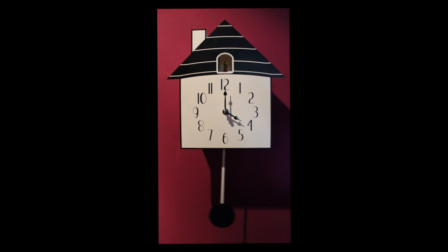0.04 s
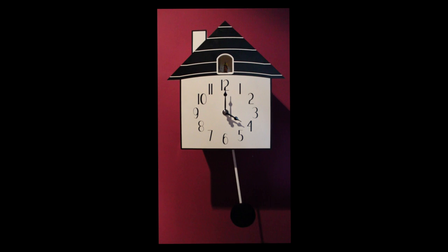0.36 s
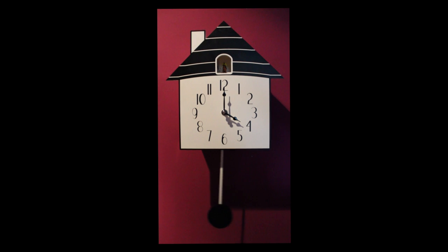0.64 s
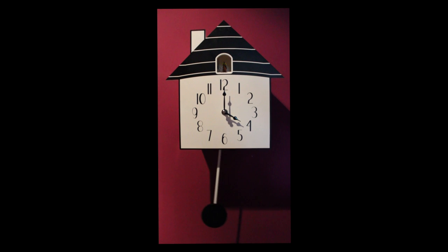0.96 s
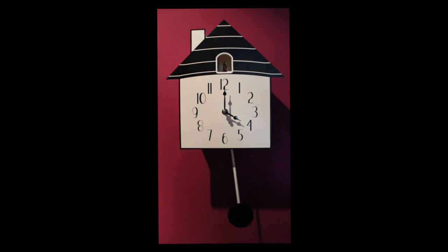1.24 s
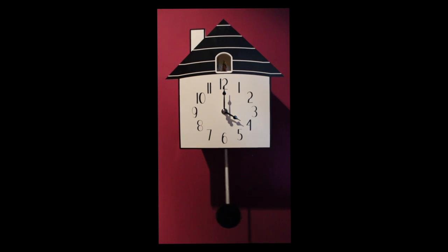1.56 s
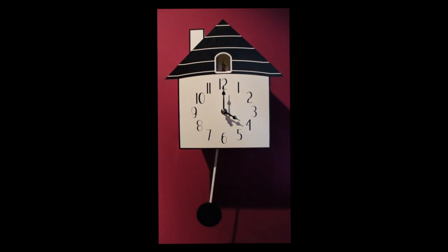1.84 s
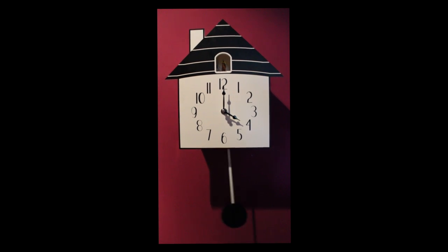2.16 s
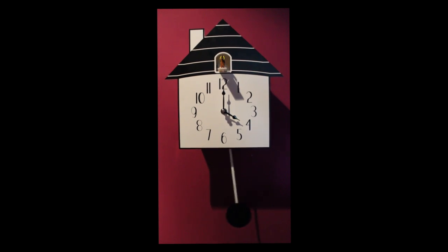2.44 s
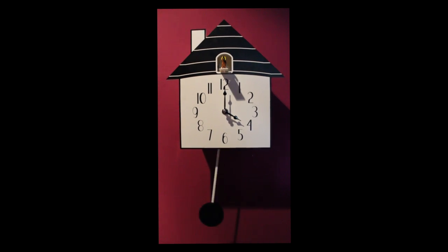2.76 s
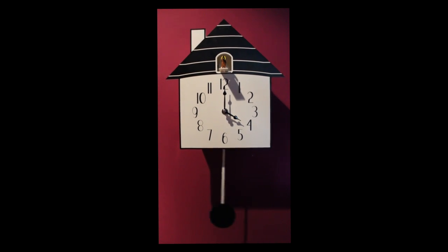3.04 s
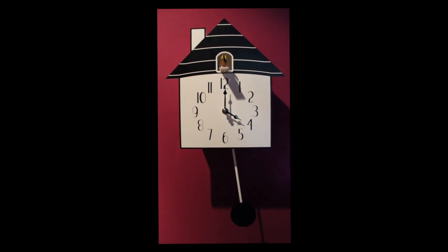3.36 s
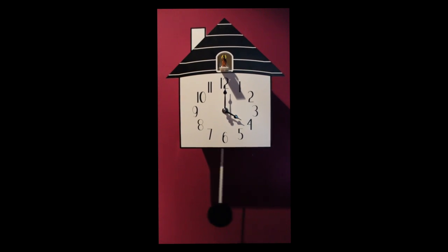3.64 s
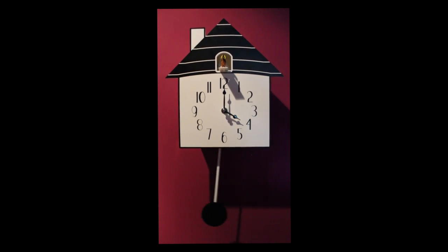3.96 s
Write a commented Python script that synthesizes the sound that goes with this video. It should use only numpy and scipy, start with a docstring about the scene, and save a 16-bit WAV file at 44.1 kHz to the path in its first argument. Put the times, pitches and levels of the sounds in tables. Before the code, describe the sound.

A small cuckoo clock mechanism gives a few light ticks, then a sharp latch clack. Its motor rasps as the figure slides out, then the gears whir and rattle on. Heard close in a quiet, dry room.

```python
"""A small wall clock in a quiet, dry room, heard close by on one microphone.
Over faint room air come a few light ticks, then the knock of the release lever and, at 2 s, the
sharp clack of a latch. The motor starts and rasps harder as it pushes a little figure out, sticking
and slipping, against a stop at 2.4 s. Then the worn gears whir on, their teeth shaking the plastic
case and throbbing once a turn."""
import sys
import numpy as np
from scipy import signal
from scipy.fft import rfft, irfft
from scipy.io import wavfile
from scipy.ndimage import uniform_filter1d

SR = 44100
rng = np.random.default_rng(int(sys.argv[2]) if len(sys.argv) > 2 else 0)


def digitize_waveform(pressure):
    """Quantize a signal to 16-bit integers and store it at the path in sys.argv[1].

    Rows of a 2-D input are taken as channels; values are limited to [-1, 1].
    """
    field = np.atleast_2d(pressure).T
    bounded = np.clip(field, -1, 1)
    quanta = np.round(bounded * 32767).astype(np.int16)
    wavfile.write(sys.argv[1], SR, quanta)


N = 176400
TIME = np.arange(N) / SR


def undb(db):
    """Decibels to gain."""
    return 10 ** (np.asarray(db) / 20)


def unit(x):
    """Scale to rms 1."""
    return x / np.sqrt(np.mean(x ** 2) + 1e-24)


def curve(rows):
    """Join (time [s], value) rows by straight lines."""
    return np.interp(TIME, *np.array(rows).T)


def fade(t, t60):
    """Exponential decay that starts at t = 0."""
    return (t >= 0) * np.exp(-np.log(1000) * np.maximum(t, 0) / t60)


def wander(rate_hz):
    """Smooth random motion at rms 1."""
    size = int(SR / rate_hz)
    steps = np.repeat(rng.standard_normal(N // size + 1), size)
    return unit(uniform_filter1d(steps, size)[:N])


def colour(x, points):
    """Causal filter through (frequency [Hz], gain [dB]) points, falling away below the first."""
    hz, db = np.array(points).T
    f = np.maximum(np.arange(N + 1) * SR / (2 * N), 1)
    shape_db = np.interp(np.log(f), np.log(hz), db) - 10 * np.log10(1 + (hz[0] / 2 / f) ** 2)
    cepstrum = irfft(np.log(undb(shape_db)))
    cepstrum[1:N] *= 2  # fold to minimum phase
    cepstrum[N + 1:] = 0
    return irfft(rfft(x, 2 * N) * np.exp(rfft(cepstrum)))[:N]


def tilt(rows, db_per_octave):
    """Brighten or dull a table whose rows begin with (frequency [Hz], level [dB])."""
    return [(hz, db + db_per_octave * np.log2(hz / rows[0][0]), *rest) for hz, db, *rest in rows]


def resonate(x, hz, width):
    """A steep resonance: two band-passes in a row."""
    b, a = signal.iirpeak(hz, hz / (1.78 * width), fs=SR)
    return signal.lfilter(b, a, signal.lfilter(b, a, x))


def clicks(times, sizes):
    """Impulses at the given moments."""
    return np.bincount(np.clip(times * SR, 0, N).astype(int), sizes, N + 1)[:N]


def scrape(hits, decay_s):
    """Each click drags a short burst of friction noise behind it."""
    pole = np.exp(-2 / (decay_s * SR))
    power = signal.lfilter([1 - pole], [1, -pole], hits ** 2 + 1e-18)
    return np.sqrt(power) * rng.standard_normal(N)


def tail(x, t60):
    """Diffuse ringing with about the energy of its input."""
    t = np.arange(SR // 2) / SR
    response = rng.standard_normal(len(t)) * fade(t, t60)
    return signal.fftconvolve(x, response / np.linalg.norm(response))[:N]


def blow(at, spectrum, t60, rise, modes=(), ring_db=0):
    """A short crack plus ringing modes, with the energy of 10 ms at rms 1."""
    t = TIME - at
    attack = 1 - np.exp(-np.maximum(t, 0) / rise)
    hit = unit(colour(rng.standard_normal(N) * attack * fade(t, t60), spectrum))
    if len(modes):
        ring = sum(undb(db) * fade(t, life) * np.sin(2 * np.pi * (hz * t + rng.random()))
                   for hz, db, life in modes)
        hit = hit + undb(ring_db) * unit(ring * attack)
    return unit(hit) * np.sqrt(0.01 * SR / N)


def room_tone():
    """Soft air all round the microphone, with a faint hum and a thin, steady whistle."""
    # spectrum of the air, bands of hum, whistle tones (frequency [Hz], level [dB])
    air_spectrum = [(15, -32), (25, -16), (64, -4.5), (119, -8.5), (289, -6.5), (389, -4), (421, -9),
                    (567, -11.5), (614, -12), (1620, -15.5), (1750, -14.5), (2560, -16), (3260, -15),
                    (4500, -17.5), (5880, -14.5), (6550, -17.5), (15500, -24.5)]
    hum_bands = [(243, -77), (293, -75.5), (391, -79), (1820, -81.5), (6040, -80)]
    whistle_tones = [(7983, -81.5), (8979, -83), (9976, -80)]
    hum = sum(undb(db) * unit(resonate(rng.standard_normal(N), hz, width=5.7)) for hz, db in hum_bands)
    whistle = sum(undb(db) * unit(np.sin(2 * np.pi * hz * TIME)) for hz, db in whistle_tones)
    air = undb(-64.5) * unit(colour(rng.standard_normal(N), air_spectrum))
    return air + hum + whistle


def bumps():
    """A few soft, dull bumps in the background."""
    # bumps (time [s], level [dB])
    hits = [(1.504, -56), (3.54, -58.5), (3.613, -53.5), (3.929, -54.5)]
    # their low thud (frequency [Hz], level [dB])
    thud = [(40, -13), (90, -5), (180, 0), (300, -10), (700, -29), (2000, -60)]
    return sum(undb(db) * blow(at, thud, t60=0.05, rise=0.0039) for at, db in hits)


def squeaks():
    """Brief, faint, high squeaks and rubs in the works."""
    # swells of noise (time [s], pitch [Hz], width [Hz], level [dB], half length [s])
    rubs = [(0.065, 4600, 1500, -58.5, .009), (0.651, 5500, 2000, -64, 0.0054),
            (1.373, 6045, 60, -63.5, .025), (1.135, 6045, 60, -71, .03), (1.687, 3000, 3500, -62.5, .015)]
    sound = np.zeros(N)
    for at, hz, width, db, half in rubs:
        swell = np.exp(-((TIME - at) / half) ** 2)
        sound += undb(db) * swell * unit(resonate(rng.standard_normal(N), hz, width))
    return sound


def ticks():
    """Light, dry ticks at uneven intervals, some brighter than others."""
    # ticks (time [s], level [dB], brightness [dB per octave])
    hits = [(0.0997, -52.5, -0.5), (.169, -61, 0.5), (0.369, -50.5, 1), (0.408, -47, 1),
            (.582, -45.5, -0.5), (1.303, -65, -8), (1.322, -60, -6.5), (1.922, -47, -1), (3.283, -46.5, 0),
            (3.945, -44.5, 5)]
    # crack of a tick (frequency [Hz], level [dB])
    crack = [(300, -34), (1300, -12), (3280, -9), (4700, -11.5), (6300, -2.5), (7000, -18), (7900, -7),
             (10200, -12.5), (11000, -0.5), (12500, -21), (15500, -33)]
    # its ringing (frequency [Hz], level [dB], t60 [s])
    modes = [(1770, -16.5, 0.025), (2290, -9.5, 0.016), (3290, -4.5, 0.025), (6050, -6, 0.024),
             (6300, -5, 0.022), (7840, 3, 0.0092), (10840, 4.5, 0.0091), (11200, 1, 0.0083)]
    return sum(undb(db) * blow(at, tilt(crack, bright), t60=0.012, rise=0.0012,
                               modes=tilt(modes, bright), ring_db=1) for at, db, bright in hits)


def lever_knock():
    """The release lever knocks once and rings in the midrange."""
    # crack of the lever (frequency [Hz], level [dB])
    crack = [(120, -75), (200, -24), (1600, 0.5), (2280, -12), (3040, -16), (4910, -32), (5560, -24),
             (9470, -46), (10900, -26.5), (14000, -59)]
    # its ringing (frequency [Hz], level [dB], t60 [s])
    modes = [(490, -11.5, 0.051), (830, -14, 0.05), (1030, -6, 0.055), (1254, 7.5, 0.024),
             (1226, -29.5, 0.67), (1577, 5, 0.027), (2100, -0.5, 0.032), (2310, 1.5, 0.018)]
    return undb(-30.5) * blow(1.8662, crack, t60=0.018, rise=0.00037, modes=modes, ring_db=5)


def latch():
    """The latch clacks sharply and leaves a bright, diffuse ring."""
    # crack of the latch (frequency [Hz], level [dB])
    crack = [(120, -75), (200, -35), (720, -21.5), (1880, -37), (2800, -7.5), (3610, -15.5), (4100, -6),
             (4840, -11.5), (5110, -5.5), (5910, 1.5), (8820, -17.5), (11000, -12), (15500, -36)]
    # its ringing (frequency [Hz], level [dB], t60 [s])
    modes = [(2560, -17, 0.072), (2754, -9.5, 0.1), (3150, -16, 0.12), (4250, -5, .11), (5263, 4, 0.048),
             (5760, -12, 0.046), (5980, -15, 0.13), (6530, 3.5, 0.084), (7040, -11, 0.18),
             (7500, -11, 0.11), (8340, -12, 0.14), (10700, -4, 0.062)]
    clack = undb(-19.5) * blow(1.9972, crack, t60=0.037, rise=0.0016, modes=modes, ring_db=-4.5)
    return clack + undb(-6.5) * tail(clack, t60=0.14)


def figure_stop():
    """The figure hits its stop."""
    # crack of the impact (frequency [Hz], level [dB])
    crack = [(150, -32), (350, -18), (660, -7), (910, 1), (1630, -13.5), (2230, -0.5), (3200, -0.5),
             (3830, -9.5), (5400, -3), (6700, -15), (8800, -8.5), (15500, -32)]
    return undb(-20.3) * blow(2.3985, crack, t60=0.059, rise=0.0013)


def figure_rasp(slips_per_s=1100):
    """Dense stick-slip clicks as the figure is pushed out; now and then it catches and jerks free."""
    # swell of the slide, and the single jerks (time [s], level [dB])
    swell = [(2.075, -66), (2.092, -45), (2.104, -49), (2.112, -39.5), (2.17, -36), (2.195, -33),
             (2.322, -29.5), (2.345, -25), (2.39, -27.5), (2.425, -37), (2.48, -58)]
    catches = [(2.106, -35), (2.137, -35.5), (2.178, -32.5), (2.2773, -26), (2.3277, -26.5)]
    # spectrum of the friction (frequency [Hz], level [dB])
    friction = [(200, -38), (420, -13.5), (680, -15), (930, -2), (1150, -11), (1550, -9.5), (1730, -20),
                (2000, -12), (2450, -13.5), (2800, -9), (3500, -3), (3900, -10.5), (4500, -6.5), (5000, 1),
                (6050, -1.5), (6700, -15), (7350, -4), (7800, -11), (8800, -8.5), (11000, -19),
                (13500, -25), (15500, -29)]
    offset, strength, side = rng.random((int(slips_per_s * N / SR), 3)).T
    times = (np.arange(len(offset)) + offset) / slips_per_s
    slips = clicks(times, undb(9 * strength) * np.sign(side - 0.5))
    jerks = sum(undb(db) * blow(at, friction, t60=0.059, rise=0.0008) for at, db in catches)
    slips = slips + undb(8) * scrape(slips, decay_s=0.0016)
    sliding = (TIME > swell[0][0]) * (TIME < swell[-1][0])
    return unit(colour(slips, friction)) * undb(curve(swell)) * sliding + jerks


def throb(turns, depth_db, place):
    """Gain that swings once a turn; a positive depth peaks at the given place (0-1)."""
    return undb(depth_db * np.cos(2 * np.pi * (turns - place)))


def tooth_clicks(turns, count=48, jitter_s=0.00005, scatter_db=2):
    """Worn teeth click in nearly the same uneven pattern on every turn."""
    places = (np.arange(count) + rng.random(count)) / count
    signs = rng.choice([-1, 1], count)
    whole_turns = np.arange(np.ceil(turns[0]), np.ceil(turns[-1]))
    times = np.interp((whole_turns[:, None] + places).ravel(), turns, TIME, right=2 * TIME[-1])
    lag, force = rng.standard_normal((len(times), 2)).T
    return clicks(times + jitter_s * lag, np.tile(signs, len(whole_turns)) * undb(scatter_db * force))


def tooth_contact(teeth):
    """Each tooth's click with a short, bright scrape behind it."""
    treble = signal.butter(2, 1750, "high", fs=SR)
    return teeth + undb(-0.5) * signal.lfilter(*treble, scrape(teeth, decay_s=0.00073))


def plastic_case(teeth, turns, waver_db=1.24):
    """The teeth shake the case, each resonance hardest at its own part of the turn."""
    # resonances (frequency [Hz], width [Hz], level [dB], throb [dB], place in the turn [0-1])
    modes = [(813, 119, -17.5, 0.5, 0.7), (944, 106, -16, 1.5, .45), (1267, 283, -14, 2, 0.04),
             (1876, 116, -15.5, 1.5, 0.08), (2123, 57, -11.5, 5, 0.01), (2236, 55, -7.5, 6, 0.1),
             (2831, 224, -1.5, 2, 0.07), (3093, 95, -1.5, 1.5, 0.8), (3245, 78, -2.5, 2, 0.94),
             (3486, 130, -4.5, 0.8, .02), (4284, 100, -5, -0.5, .05), (4585, 260, -2.5, 2.5, 0.2),
             (4990, 360, .5, 2.5, 0), (5583, 105, -2, 2, 0.97), (5940, 83, -5, 7, 0.9),
             (6110, 110, -2.5, 4.5, .87)]
    sound = np.zeros(N)
    for hz, width, db, depth, place in modes:
        gain = undb(db + waver_db * wander(9))
        shaking = tooth_contact(teeth) * throb(turns, depth, place)
        sound += gain * unit(resonate(shaking, hz, width))
    return undb(-1.5) * unit(sound)


def gear_rattle(teeth, turns):
    """The broad rattle of the teeth themselves, throbbing once a turn."""
    # body and bright edge of the tooth clicks (frequency [Hz], level [dB])
    body_spectrum = [(100, -44.5), (600, -9), (800, -12.5), (1650, -30), (2200, -24), (3100, -12),
                     (3900, -8), (4700, -8), (6000, -1), (7000, -6), (10000, -20.5), (15500, -24)]
    edge_spectrum = [(4500, -37.5), (6300, -8.5), (7200, 3.5), (8200, -4.5), (9500, -10), (11000, -15.5),
                     (13000, -24.5), (15500, -29.5)]
    body = undb(-17) * unit(colour(tooth_contact(teeth), body_spectrum))
    edge = undb(-11) * unit(colour(tooth_contact(teeth), edge_spectrum))
    return (body + edge) * throb(turns, depth_db=1.5, place=0.93)


def pinion(turns, cycles_per_turn=138):
    """The motor pinion sings, roughened by uneven teeth."""
    tone = np.sin(2 * np.pi * cycles_per_turn * turns + wander(160))
    return undb(-11) * unit(tone) * throb(turns, depth_db=4.5, place=0.11)


def mesh_whine(turns, waver_db=2.5, rough_rad=0.26):
    """The meshing gears whine in wavering tones that follow their speed."""
    # mesh tones (order [cycles per turn], relative level [dB])
    tones = [(22, -37), (23, -33), (24, -34), (25, -31.5), (26, -30.5), (27, -31.5), (28, -28.5), (29, -31),
             (38, -34), (63, -25), (64, -24), (89, -18), (92, -18), (143, -18)]
    sound = np.zeros(N)
    for order, db in tones:
        gain = undb(db + waver_db * wander(7))
        phase = 2 * np.pi * (order * turns + rng.random())
        roughness = rough_rad * np.sqrt(order / tones[0][0]) * wander(60)
        sound += gain * unit(np.sin(phase + roughness))
    return undb(-3) * sound


def whir(turn_start_s=2.496):
    """The motor runs the gears at a slightly unsteady speed inside the case."""
    # speed of the gear (time [s], speed [turns per s])
    speed = [(2.54, 36.0), (2.64, 31.1), (2.73, 35.2), (2.85, 35.1), (2.92, 34.4), (3.02, 33.8), (3.13, 33),
             (3.22, 32.1), (3.33, 34.3), (3.41, 35.4), (3.49, 35.3), (3.59, 32.7), (3.68, 32.5),
             (3.8, 34.3), (3.89, 33.6), (4, 34.2)]
    # swell of the whir (time [s], gain [dB])
    swell = [(2.085, -49.5), (2.2, -37), (2.42, -35.5), (2.57, -34.5), (2.66, -36), (2.87, -32.5),
             (3.18, -35), (3.49, -33), (3.72, -34), (4, -34.3)]
    # narrow gaps between the case resonances (frequency [Hz])
    nulls = [1640, 2340, 3175, 3820, 4370, 5440]
    turns = np.cumsum(curve(speed)) / SR
    turns -= np.interp(turn_start_s, TIME, turns)
    teeth = tooth_clicks(turns)
    sound = plastic_case(teeth, turns) + gear_rattle(teeth, turns) + pinion(turns) + mesh_whine(turns)
    for hz in nulls:
        sound = sound - 0.75 * resonate(sound, hz, width=57)
    return sound * undb(curve(swell)) * (TIME > swell[0][0])


def scene():
    """The clock close to the microphone, with a little of the small, dry room behind it."""
    clock = ticks() + lever_knock() + latch() + figure_stop() + squeaks() + figure_rasp() + whir()
    reverb = undb(-18) * tail(clock, t60=0.16)
    return (clock + reverb + bumps() + room_tone())[None]


def record(dry):
    """The recorder cuts the top steeply above 15.9 kHz."""
    return signal.sosfilt(signal.ellip(10, 0.2, 80, 15900, fs=SR, output="sos"), dry)


dry = scene()
out = record(dry)
digitize_waveform(out)
```